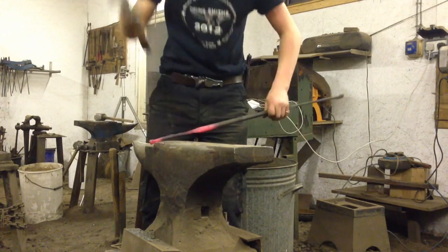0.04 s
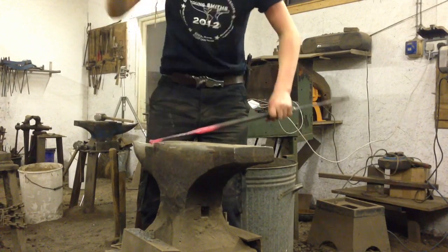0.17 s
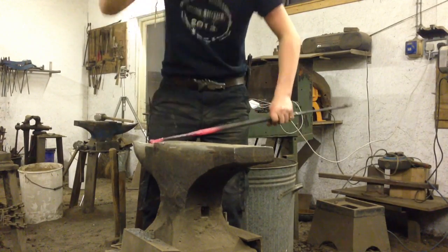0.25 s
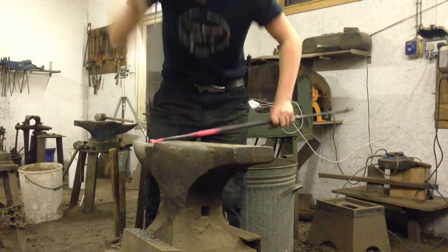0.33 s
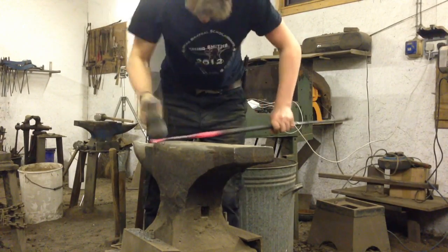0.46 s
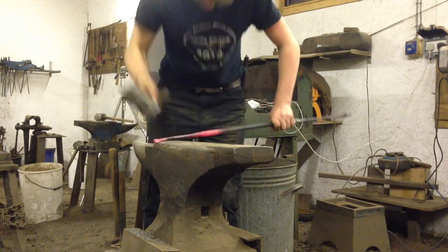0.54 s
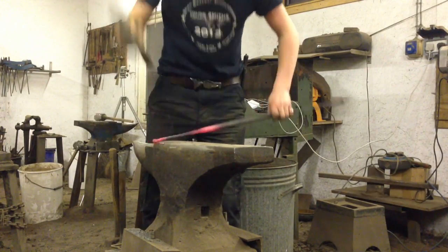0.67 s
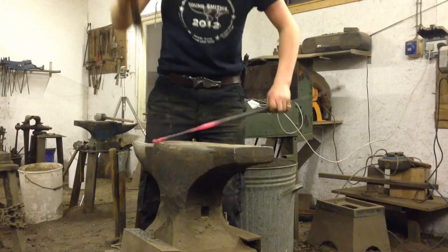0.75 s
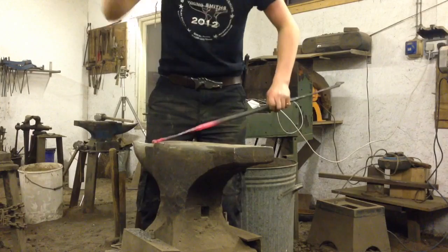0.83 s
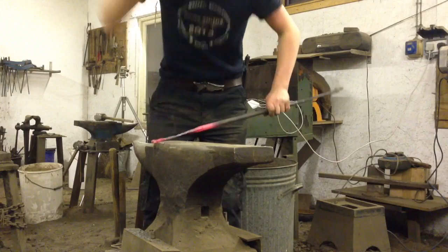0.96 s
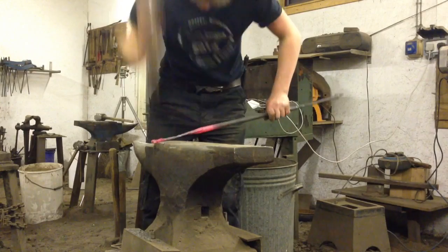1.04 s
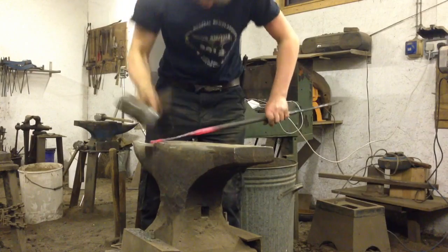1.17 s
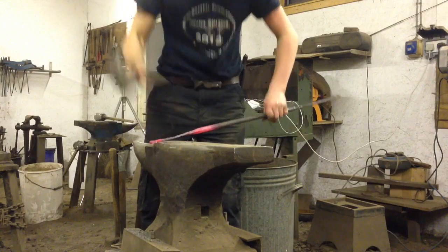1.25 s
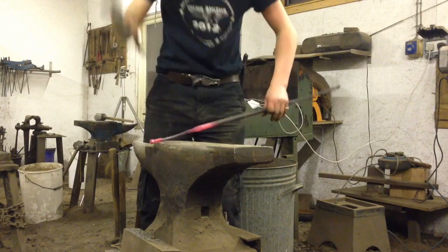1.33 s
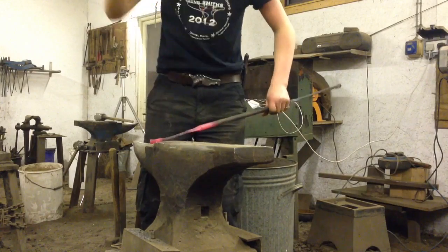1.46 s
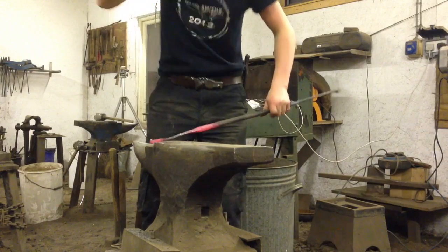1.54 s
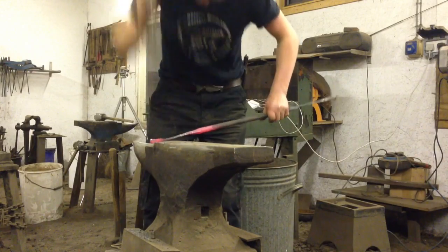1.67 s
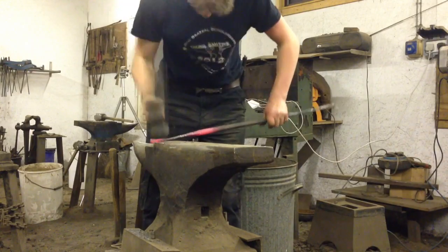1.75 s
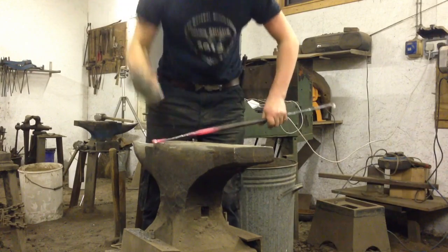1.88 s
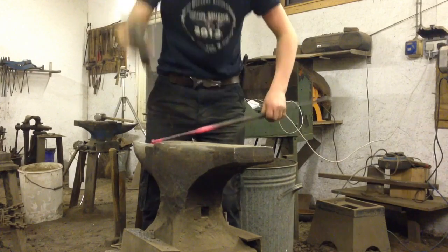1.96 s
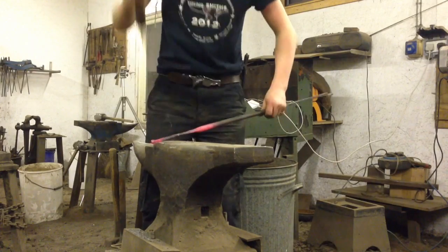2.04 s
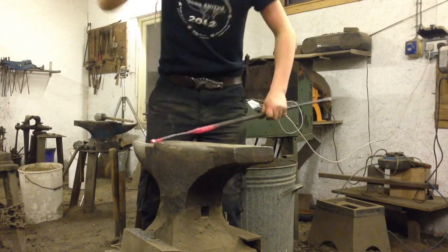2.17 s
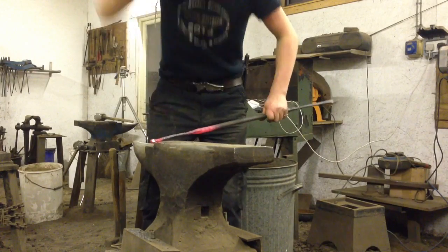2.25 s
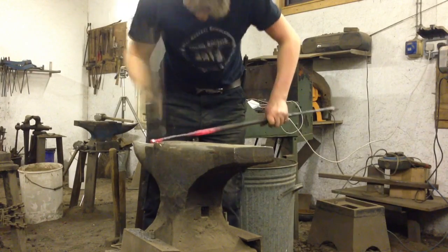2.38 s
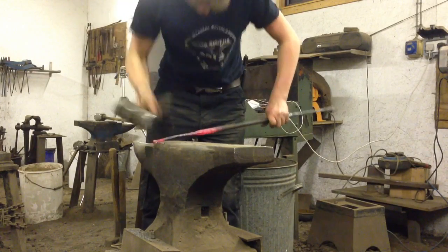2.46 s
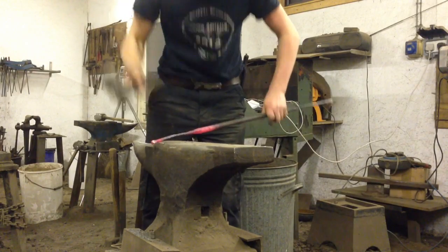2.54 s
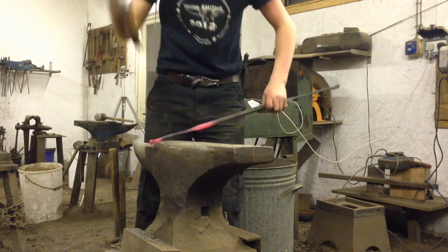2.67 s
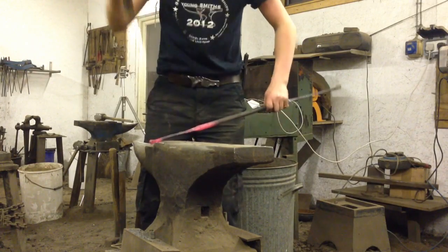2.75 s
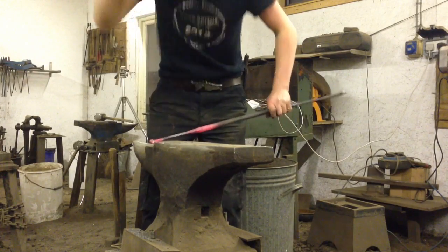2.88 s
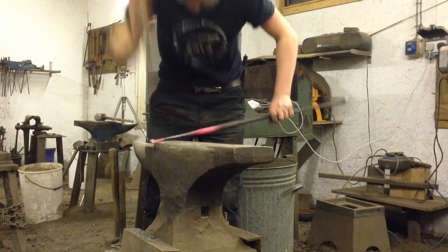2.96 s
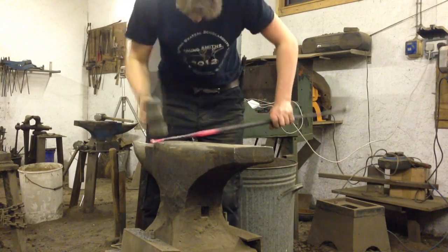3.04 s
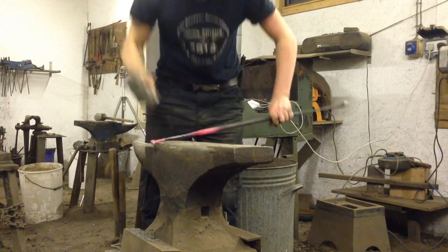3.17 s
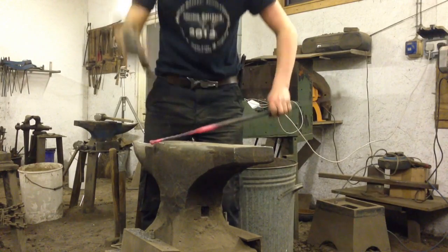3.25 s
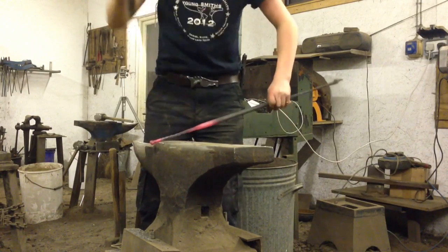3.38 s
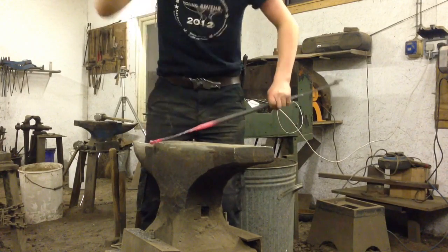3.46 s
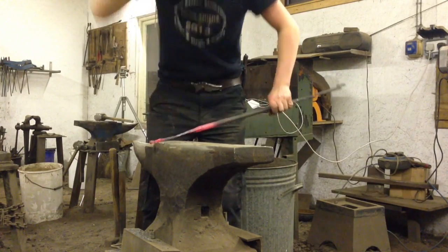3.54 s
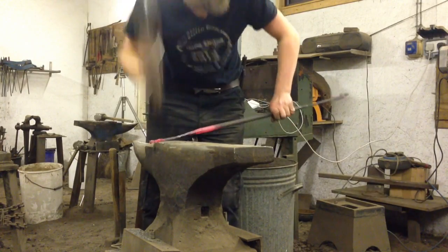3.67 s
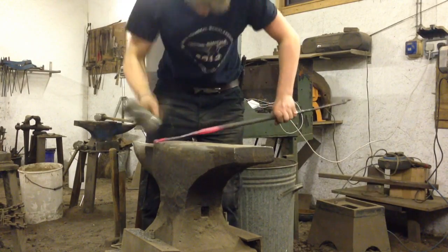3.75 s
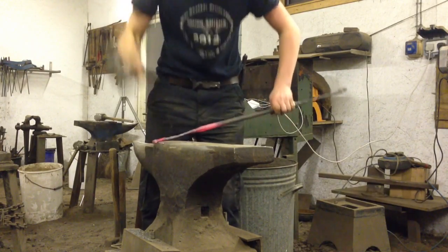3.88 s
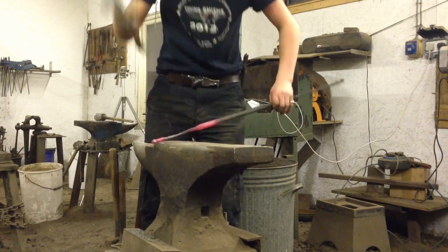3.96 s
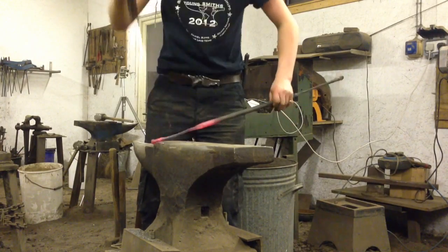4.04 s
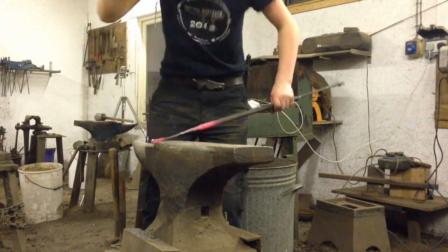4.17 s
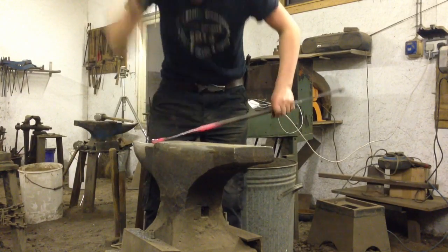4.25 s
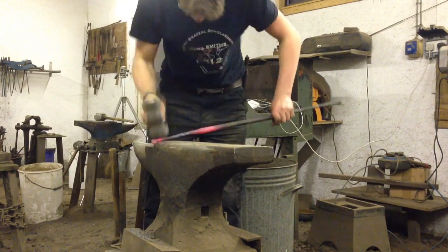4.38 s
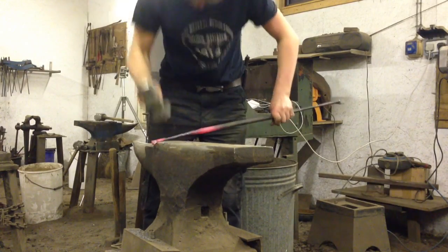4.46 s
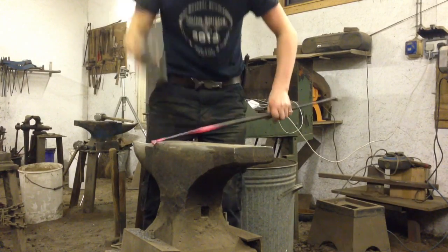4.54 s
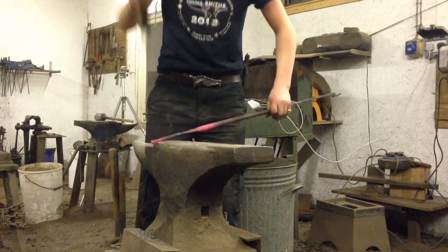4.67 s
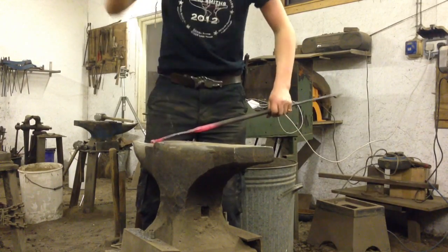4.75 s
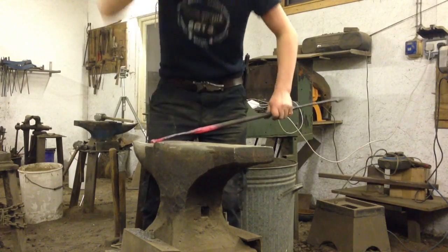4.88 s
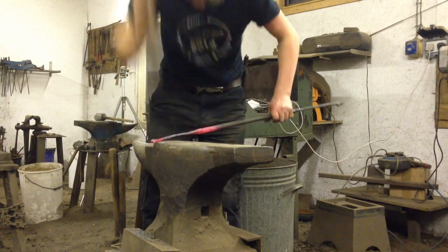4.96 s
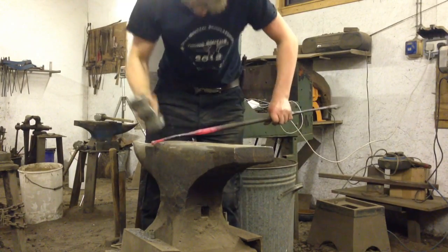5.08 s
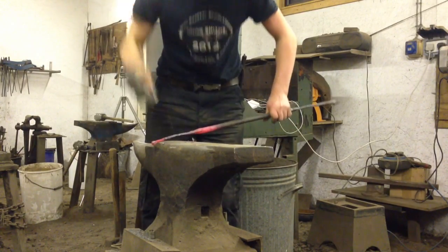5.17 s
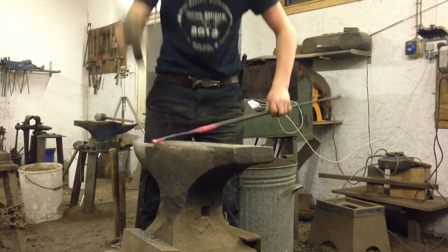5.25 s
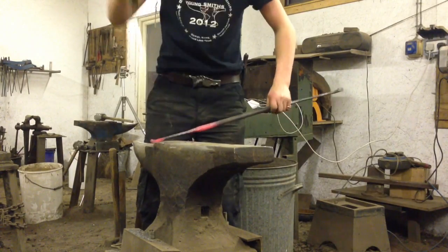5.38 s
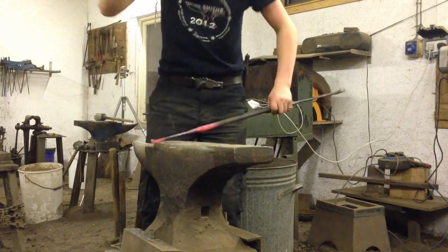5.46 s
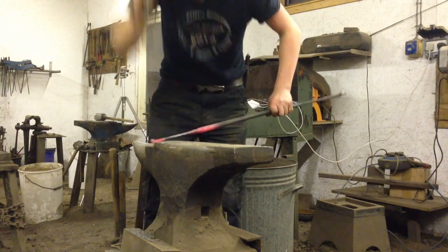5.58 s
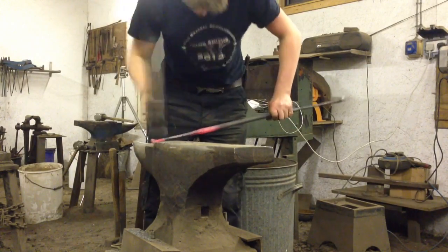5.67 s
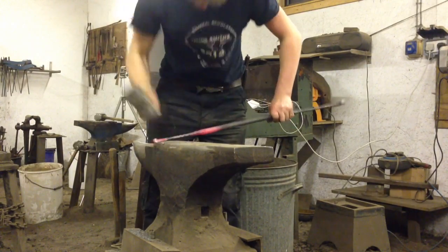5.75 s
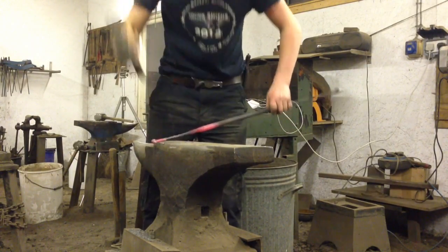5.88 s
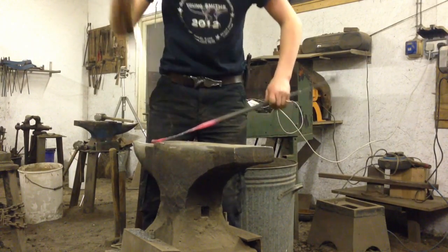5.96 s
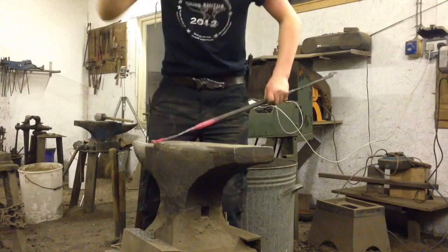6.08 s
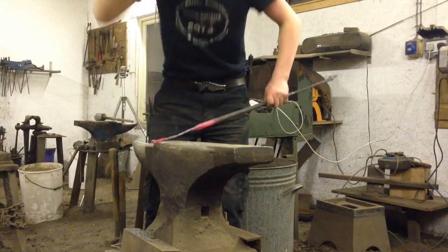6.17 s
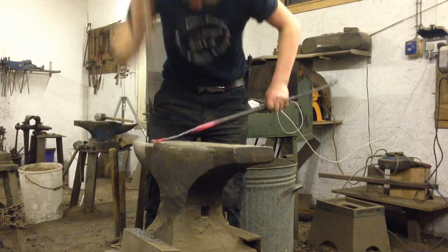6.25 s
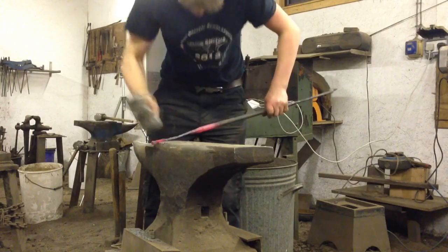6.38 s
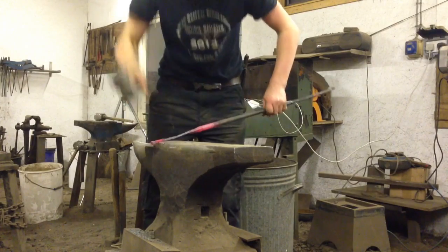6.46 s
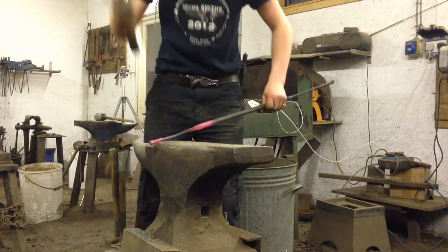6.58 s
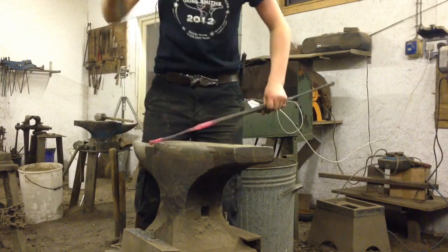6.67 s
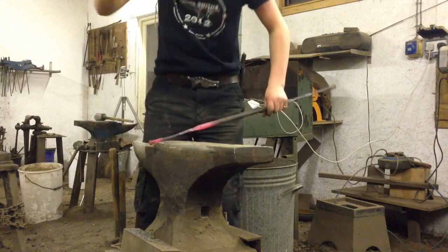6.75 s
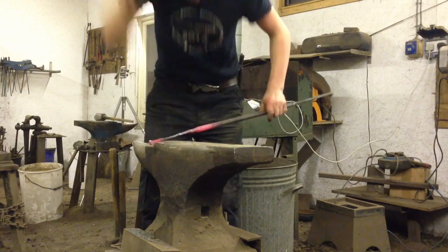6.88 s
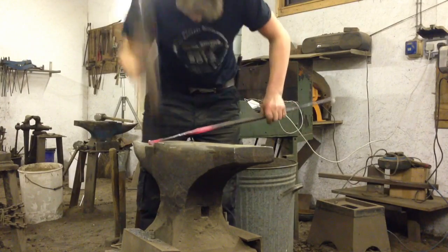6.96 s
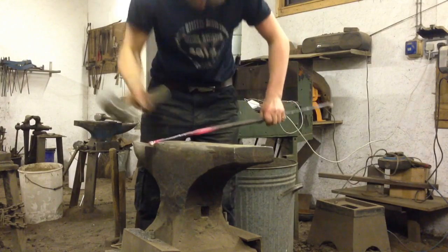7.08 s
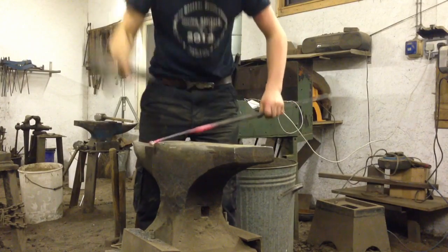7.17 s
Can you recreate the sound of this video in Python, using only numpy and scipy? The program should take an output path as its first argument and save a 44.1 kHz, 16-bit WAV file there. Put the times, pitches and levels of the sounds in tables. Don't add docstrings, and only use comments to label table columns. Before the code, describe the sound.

The fading ring of an earlier blow opens over a quiet forge blower's low hum and airy hiss. Then regular hammer blows on steel and anvil follow, each slightly different in tone and force: sharp clank, short high ring, low thud, and quick slap of room echo. Faint dry clicks of scale fall between. The last ring is cut off. One fixed nearby microphone, compressed and slightly dulled on top.

```python
import sys
import numpy as np
from scipy import signal
from scipy.fft import rfft, irfft
from scipy.io import wavfile
from scipy.ndimage import uniform_filter1d

SR = 44100
rng = np.random.default_rng(int(sys.argv[2]) if len(sys.argv) > 2 else 0)


def put_to_file(sound):
    columns = np.atleast_2d(sound).T
    safe = np.clip(columns, -1, 1)
    whole_steps = np.round(safe * 32767)
    wavfile.write(sys.argv[1], SR, whole_steps.astype(np.int16))


def natural_amplitude(level_db):
    exponent = np.asarray(level_db, float) / 20
    return 10 ** exponent


N = 318402

# f/Hz, level/dB per Hz
HISS = [(15, -21), (25, -27), (64, -44.5), (92, 1), (108, -2), (127, -9), (200, -3.5), (236, -11),
        (405, -7.5), (677, -17.5), (840, -12.5), (911, -17.5), (3920, -17.5), (14800, -41.5), (16000, -42)]
# f/Hz, width/Hz, level/dB
HUM = [(97.5, 18, 4.5), (201.3, 15, 4.5), (320, 26, 1.5), (411.4, 11, -5.5), (765, 47, -11)]
# t/s, level/dB
BLOWER_LEVEL = [(0.0, -54), (1.99, -50.5), (2.21, -54.5), (2.61, -49.5), (2.85, -55.5), (3.24, -48.5),
                (3.38, -54.5), (4.64, -51.5), (5.89, -50.5), (6.03, -53.5), (6.94, -53), (7.22, -49)]
# f/Hz, t60/s
ROOM = [(200, 0.096), (530, 0.34), (1390, 0.34), (3680, 0.33), (9700, 0.23)]
# t/s, level/dB
EARLY = [(.0012, -30), (.0024, -6), (.0035, -9), (.0047, 7), (.0063, -22), (0.012, -6.5)]
# t/s, peak level/dB, centre f/Hz, echo level/dB
TICKS = [(.3232, -34.5, 4130, -11), (.370, -46, 6000, -16), (.399, -47, 6000, -21), (.836, -48, 4000, -14),
         (1.549, -29.5, 3670, -5.5), (2.332, -41, 5000, -18), (2.863, -42, 4500, -6.5),
         (2.882, -48, 8000, -16), (2.930, -47, 7300, -18), (3.0335, -33.5, 5460, -17),
         (3.1203, -34, 4300, -12), (3.131, -41, 8000, -8), (3.727, -35, 5500, -11),
         (4.1415, -39, 5530, -14), (4.2393, -38, 4960, -14), (4.289, -41, 6500, -12), (4.97, -43, 6500, -9),
         (5.005, -42, 8000, -19), (5.4523, -34.5, 4900, -15), (5.681, -52, 9000, -14),
         (6.807, -51, 9000, -17), (6.0705, -41, 4500, -14), (6.8537, -38.5, 8000, -16)]
BLOWS = [(-0.09, -8, 0, 2.3, -0.9), (0.563, -5, 1.46, -.1, -0.59), (1.214, -5, -1.05, 0.43, -0.31),
         (1.8683, -5.5, 1, 0.19, 2.1), (2.503, -8, 0.2, 1.4, 0.17), (3.153, -8.5, 3, -0.44, -1.3),
         (3.813, -5, -0.3, 0.8, -0.78), (4.4802, -4.5, .3, -1.6, -0.9), (5.144, -6.5, -0.36, -1.5, 0.83),
         (5.7937, -4, 1.7, -0.23, 0.49), (6.443, -6, -0.5, 1.26, 1.3), (7.1017, -3.5, -0.2, 0.33, -1)]
MAIN_HZ = [3014, 3059, 3588, 3908, 6046, 14000]
# level/dB, t60/s
MAIN_MODES = [(-27, 0.24), (-23, 0.24), (-37, 0.26), (-38, 0.22), (-40, 0.27), (-58.5, 0.35)]
SIDE_HZ = [1503, 1570, 2845, 11480]
# level/dB, t60/s
SIDE_MODES = [(-39, 0.38), (-36.5, 0.35), (-37.5, 0.31), (-54, 0.16)]
LOW_HZ = [369, 565, 596, 810, 968, 1179, 1274, 1695, 1815]
# level/dB, t60/s
LOW_MODES = [(-28, 0.094), (-28.5, 0.14), (-34.5, 0.24), (-37.5, 0.36), (-23.5, 0.12), (-34.5, 0.34),
             (-64, 0.096), (-44, 0.19), (-16.5, 0.038)]
TOP_HZ = [2340, 3495, 4137, 4230, 5265, 5660, 6640, 8457, 9280, 10710]
# level/dB, t60/s
TOP_MODES = [(-56, 0.43), (-45, 0.35), (-36, 0.19), (-46, 0.27), (-47, 0.36), (-48, 0.27), (-49, 0.19),
             (-40, 0.11), (-51, 0.1), (-38, 0.089)]
# f/Hz, level/dB per Hz
CRACK = [(60, -42.5), (180, -21), (330, 0.9), (600, -3.5), (1500, -2), (2300, -6.5), (3200, -8.5),
         (5000, -10), (7000, -10), (11500, -20), (15000, -26), (16500, -34.5)]
# f/Hz, width/Hz, level above the crack/dB
CLANG = [(1550, 250, 4), (1850, 150, 4), (2900, 200, 5), (3060, 160, 6), (3540, 200, 6), (3900, 150, 5),
         (4200, 200, 6), (5250, 200, 4), (6050, 200, 5), (6650, 250, 5), (7300, 250, 4), (8400, 300, 6),
         (9300, 250, 6), (10700, 300, 6), (11480, 300, 8), (12650, 300, 6), (13400, 250, 5),
         (14600, 400, 2.5)]
# f/Hz, level/dB per Hz
THUD = [(30, -5), (50, -10.5), (90, -1.5), (160, -8), (300, -4.5), (500, -91)]
# usual level/dB, change/dB per step along, across, tilt
WAKES = [(0.5, -5.5, 0, 2), (2.2, -2, -0.2, 3), (-1, 2.5, -4, 3.5), (3, 2.3, 0, -1), (-3, 2.3, 0, 3.5),
         (0, 0.5, 3.5, -0.2), (-1.5, 2.4, 3, -1), (-1.4, 1.7, -3.4, 1), (1.2, -2, -0.3, 2.5), (5, -4, 2, 4)]
# usual level/dB, change/dB per step along, across, tilt
GROUP_WAKES = [(-4, -2, -0.15, -0.1), (-3.5, 2.5, -3.5, 0), (9, -1.5, -1.9, -0.3)]
COLOUR_HZ = [400, 1000, 2100, 4200, 11000]
# usual level/dB, change/dB per step along, across, tilt
COLOUR_WAKES = [(.3, -1.93, -2, -0.65), (.3, -0.57, -0.17, -0.77), (.3, -0.97, 0.9, 0.36),
                (.3, 0.17, -.4, -0.28), (.9, -1.2, -2.2, -.6)]

LEAD = .02
AHEAD_DB = -26
USUAL_DB, THUD_PER_DB = -5.5, -0.5
HISS_DB, HUM_DB, HUM_FOLLOWS, HUM_WOBBLE_DB = -1.03, -7, 0.64, 5.5
FREE_HZ = 13000
GLINT_DB, GLINT_S = 3, 0.0033
FLAKE_DB = 3.5
KNOCK_HZ, KNOCK_DB, KNOCK_T60 = 366, -12, .07
EDGE_HZ = 15350


def evened(x):
    return x / np.sqrt(np.mean(x ** 2) + 1e-20)


def read(points, hz):
    f, value = np.transpose(points)
    return np.interp(np.log(hz + 1), np.log(f + 1), value)


def add(mix, s, sound):
    at = round(s * SR)
    sound = sound[max(-at, 0):]
    part = mix[max(at, 0):][:len(sound)]
    part += sound[:len(part)]


def coloured(x, points):
    return irfft(rfft(x) * natural_amplitude(read(points, np.fft.rfftfreq(len(x), 1 / SR))), len(x))


def causal(gain_db, smear):
    signed = np.fft.fftfreq(4096, 1 / SR)
    hz = abs(signed)
    lag = 2 * np.pi * smear * 3000 * np.log(1 + hz / 3000) * np.sign(signed)
    minimum_phase = np.conj(signal.hilbert(np.log(natural_amplitude(gain_db(hz)))))
    click = np.fft.ifft(np.exp(minimum_phase - 1j * lag)).real[:2048]
    return click / np.linalg.norm(click)


def blower():
    frames, hz = N // 256 + 5, np.fft.rfftfreq(1024, 1 / SR)
    a, b, patches = rng.standard_normal((frames, 513, 3)).T
    patches = evened(uniform_filter1d(uniform_filter1d(patches, 10, 0), 12, 1))
    spectrum = (a + 1j * b) * natural_amplitude(read(HISS, hz)[:, None] + 2.04 * patches)
    hiss = signal.istft(spectrum, nperseg=1024, noverlap=768)[1][:N]

    fine = np.fft.rfftfreq(N, 1 / SR)
    bands = sum(natural_amplitude(db) / (1 + (2 * (fine - f) / width) ** 2) for f, width, db in HUM)
    hum = irfft(rfft(rng.standard_normal(N)) * bands, N)

    s, flow_db = np.transpose(BLOWER_LEVEL)
    usual_db = flow_db.mean()
    flow_db = np.interp(np.arange(N) / SR, s, flow_db)
    wobble = evened(signal.resample(rng.standard_normal(40), N))
    hum_db = HUM_DB + usual_db + HUM_FOLLOWS * (flow_db - usual_db) + HUM_WOBBLE_DB * wobble
    return natural_amplitude(flow_db + HISS_DB) * evened(hiss) + natural_amplitude(hum_db) * evened(hum)


def room():
    size = SR // 2
    since = np.arange(size) / SR
    taps = rng.choice([-1., 1.], size) * (rng.random(size) < .1)
    hz, t, z = signal.stft(taps, SR, nperseg=256)
    decay_db = -60 * t / read(ROOM, hz)[:, None]
    glint_db = GLINT_DB * np.outer(hz / (hz + 9000), np.exp(-t / GLINT_S))
    tail = signal.istft(z * natural_amplitude(decay_db + glint_db), SR, nperseg=256)[1][:size]
    tail *= np.clip(since / 0.0015, 0, 1)
    tail *= 1 + 1.1 * np.exp(-(since / .007) ** 2)
    tail *= natural_amplitude(16.5) / np.linalg.norm(tail)
    tail[0] += .7
    for s, db in EARLY:
        tail[round((s + rng.uniform(-.0005, .0005)) * SR)] += natural_amplitude(db) * rng.choice([-1., 1.])
    return tail


def snap(centre_hz):
    shape = [(centre_hz / 6, -30), (centre_hz / 1.8, -5), (centre_hz, 0), (centre_hz * 2.2, -12), (22000, -27)]
    return causal(lambda hz: read(shape, hz) + FLAKE_DB * np.cos(2 * np.pi * hz / centre_hz), 0.00043)


def ticks():
    out, walls = np.zeros(N), room()[:SR // 3]
    for s, db, hz, echo_db in TICKS:
        add(out, s, natural_amplitude(db + 7.5) * snap(hz))
        add(out, s + 0.007, natural_amplitude(db + echo_db) * signal.fftconvolve(snap(hz), walls))
    crackle = (rng.random(N) < 25 / SR) * natural_amplitude(-64 + 1.4 * rng.exponential(1, N))
    return out + signal.oaconvolve(crackle, snap(5600))[:N]


def ring(hz, modes, extra_db, spread_db, twin):
    t = np.arange(SR // 2) / SR - LEAD
    db, t60 = np.transpose(modes)[:, :, None]
    luck, phase = rng.random((2, len(modes), 1))
    flutter = rng.standard_normal((len(modes), 2, 40))
    flutter = signal.resample(flutter[:, 0] + 1j * flutter[:, 1], len(t), axis=1)
    flutter = flutter * (np.reshape(hz, (-1, 1)) < FREE_HZ)
    level = natural_amplitude(db + extra_db + 2 * spread_db * luck - 60 * t / t60)
    bloom = 1 - (.4 + .47 * twin) * np.exp(-(t / .024) ** 2)
    ahead = natural_amplitude(AHEAD_DB) * twin
    swell = np.where(t < 0, ahead * np.exp(t / .005), np.minimum(t / .0013 + ahead, bloom))
    tone = (1 + .55 * flutter) * np.exp(2j * np.pi * (np.outer(hz, t) + phase))
    return (level * swell * tone.real).sum(0)


def contact(colour_db):
    luck = rng.uniform(.4, 1.6, len(CLANG))
    colour = list(zip(COLOUR_HZ, colour_db))

    def clang_db(hz):
        return sum(k * db / (1 + (2 * (hz - f) / width) ** 2) for k, (f, width, db) in zip(luck, CLANG))

    return causal(lambda hz: read(CRACK, hz) + read(colour, hz) + clang_db(hz), 0.001784)


def blow(walls, crack_db, thud_db, low_db, top_db, colour_db, partials_db):
    t = np.arange(SR // 2) / SR - LEAD
    crack = np.zeros(len(t))
    add(crack, LEAD, natural_amplitude(7.5) * signal.fftconvolve(contact(colour_db), walls))

    thud = evened(coloured(rng.standard_normal(len(t)), THUD)) * natural_amplitude(thud_db - 41.5 - 60 * t / .5)
    thud = thud * np.clip(t / 0.0029, 0, 1)
    knock = natural_amplitude(KNOCK_DB + low_db - 60 * t / KNOCK_T60) * np.sin(2 * np.pi * KNOCK_HZ * t)
    knock = knock * np.clip(t / 0.0016, 0, 1)

    twins = (np.arange(len(partials_db)) < 2)[:, None]
    steel = ring(MAIN_HZ + SIDE_HZ, MAIN_MODES + SIDE_MODES, np.reshape(partials_db, (-1, 1)), 0, twins)
    steel = steel + ring(LOW_HZ, LOW_MODES, low_db - 3, 3, 0)
    steel = steel + ring(TOP_HZ, TOP_MODES, top_db, 3, 0)
    return natural_amplitude(crack_db) * (crack - knock + natural_amplitude(14.5) * steel + thud)


def hammer():
    out, walls = np.zeros(N), room()
    for s, crack_db, *spot in BLOWS:
        landing = [1, *spot]
        partials_db = np.dot(WAKES, landing)
        low_db, top_db, thud_db = np.dot(GROUP_WAKES, landing)
        colour_db = np.dot(COLOUR_WAKES, landing)
        thud_db = thud_db + THUD_PER_DB * (crack_db - USUAL_DB)
        here = 0.5 * walls + 0.78 * room()
        add(out, s - LEAD, blow(here, crack_db, thud_db, low_db, top_db, colour_db, partials_db))
    return out


def scene():
    return (blower() + ticks() + hammer())[None]


def limiter(x):
    power_db = 10 * np.log10(abs(uniform_filter1d(x ** 2, 90)) + 1e-12)
    fall = np.arange(N) * 90. / SR
    over_db = np.maximum(np.maximum.accumulate(power_db + fall) - fall + 11.5, 0)
    squeezed = x / natural_amplitude(0.88 * uniform_filter1d(over_db, 40))
    return .95 * np.tanh(squeezed / .95)


def thin_treble(x):
    hz, t, z = signal.stft(x, SR, nperseg=1024)
    power_db = 10 * np.log10(abs(z) ** 2 + 1e-20)
    middle_db = 10 * np.log10((abs(z[20:100]) ** 2).mean(0) + 1e-20)
    peak_db, rise_db = middle_db.max(), np.diff(middle_db, prepend=0)
    luck = rng.standard_normal((len(t) // 8 + 1, 74)).T
    luck = luck.repeat(7, 0).repeat(8, 1)[:len(hz), :len(t)]
    mask_db = middle_db - 27 + 10 * luck + 4 * np.log2(hz / 12000 + .01)[:, None]

    settled = (rise_db < 1) & (np.roll(middle_db, -1) - middle_db < 3) & (middle_db > peak_db - 22)
    clear = power_db > uniform_filter1d(power_db, 15, 0) + 11
    unspared = uniform_filter1d(clear * 1., 3, 0) < .1
    dropped = (power_db < mask_db) & unspared & (hz > 8500)[:, None] & settled

    fading = (np.roll(middle_db, -2) - middle_db < 2) & (rise_db < 2) & (middle_db > peak_db - 33)
    above_edge = hz[:, None] > 14500 + 300 * luck
    dropped = dropped | (above_edge & fading & (middle_db < peak_db - 12))
    return x - signal.istft(z * dropped, SR, nperseg=1024)[1][:N]


def low_pass(x):
    return signal.sosfilt(signal.butter(12, 16490, fs=SR, output="sos"), x)


def record(dry):
    limited = limiter(dry[0])
    limited = signal.sosfilt(signal.butter(2, 45, "high", fs=SR, output="sos"), limited)
    lowpass = signal.firwin(401, EDGE_HZ, window=("kaiser", 7), fs=SR)
    below = signal.oaconvolve(limited, lowpass, "same")
    shelved = below + natural_amplitude(-24) * (limited - below)
    return low_pass(thin_treble(shelved)[None])


dry = scene()
out = record(dry)
put_to_file(out)
```